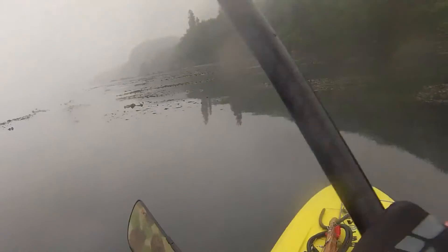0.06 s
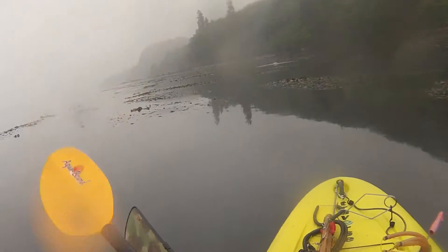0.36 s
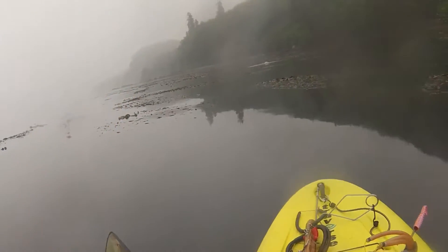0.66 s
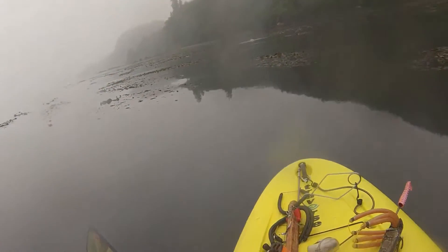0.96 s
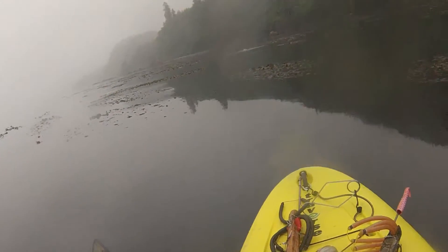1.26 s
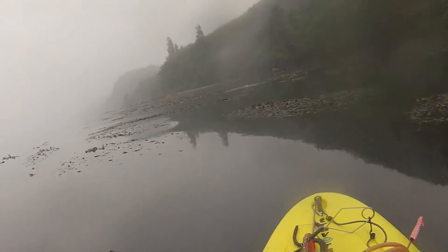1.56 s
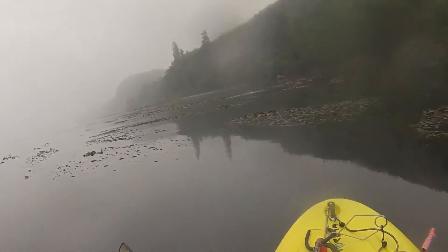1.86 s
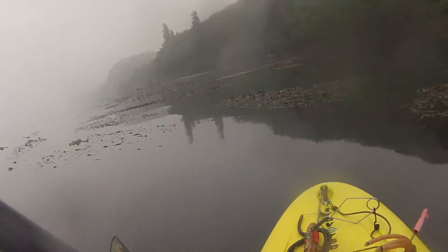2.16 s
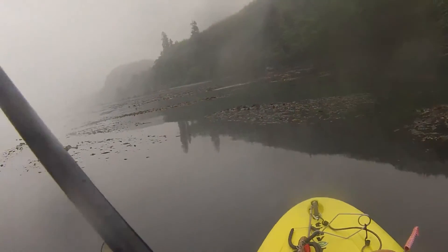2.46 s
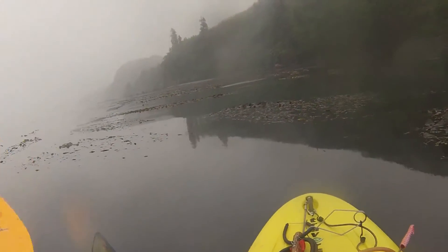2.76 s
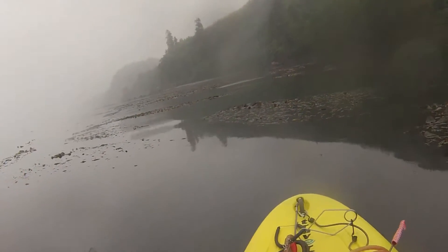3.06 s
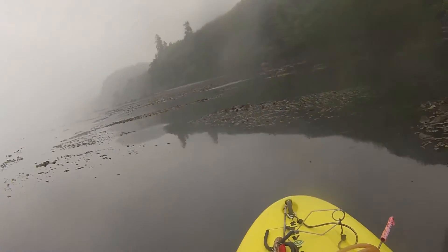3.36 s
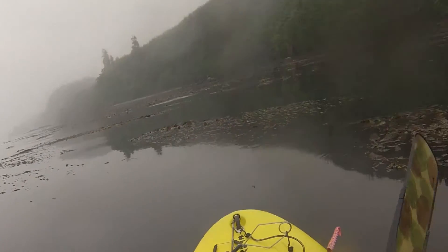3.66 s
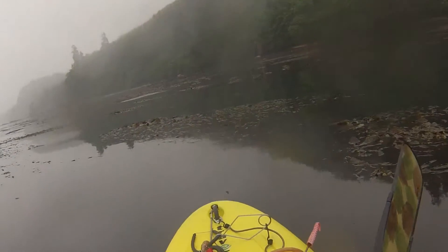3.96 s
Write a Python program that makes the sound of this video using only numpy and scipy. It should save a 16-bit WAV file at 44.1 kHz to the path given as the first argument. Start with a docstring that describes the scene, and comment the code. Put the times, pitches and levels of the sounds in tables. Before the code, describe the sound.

Gentle paddling on calm water, with small splashes, drips and a soft wind rumble.

```python
"""Gentle paddling on calm water, close to the microphone of a camera on board a small gliding craft.
Blade and hull lap up little splashes, drops tick on the surface, trapped bubbles ring and a fine
trickle follows the strokes. The camera's case colours these sounds; ripples knock dully under the hull.
Behind them, wind rumbles softly on the microphone over a faint hiss."""
import sys
import numpy as np
from scipy import signal
from scipy.fft import rfft, irfft
from scipy.io import wavfile

SR = 44100
rng = np.random.default_rng(int(sys.argv[2]) if len(sys.argv) > 2 else 0)


def output_pcm(signal):
    """Save a mono or channel-first signal as 16-bit PCM at the path in sys.argv[1].

    Samples are clipped to [-1, 1] before scaling.
    """
    pcm = np.clip(np.atleast_2d(signal).T, -1, 1) * 32767
    wavfile.write(sys.argv[1], SR, np.round(pcm).astype(np.int16))


N = 176400
TIME = np.arange(N) / SR


def from_db(db):
    """Decibels to gain."""
    return 10 ** (np.asarray(db) / 20)


def rms_one(x):
    """Scale to unit rms."""
    return x / np.sqrt(np.mean(x ** 2) + 1e-20)


def in_time(rows):
    """Each column of a curve at every sample."""
    times, *columns = np.transpose(rows)
    return [np.interp(TIME, times, column) for column in columns]


def add(out, at, sound):
    """Mix a sound in, starting `at` seconds."""
    start = int(at * SR)
    first, last = max(start, 0), min(start + len(sound), N)
    out[first:last] += sound[first - start:last - start]


def colour(x, spectrum):
    """Shape a sound by a spectrum, rolled off below 10 Hz; rms 1."""
    hz, db = np.transpose(spectrum)
    f = np.maximum(np.arange(len(x) // 2 + 1) * SR / len(x), 1)
    gain = from_db(np.interp(np.log(f), np.log(hz), db)) * np.minimum(f / 10, 1) ** 2
    return rms_one(irfft(rfft(x) * gain, len(x)))


def noise(spectrum):
    """Coloured noise; rms 1."""
    return colour(rng.standard_normal(N), spectrum)


def drift(points):
    """A wandering line through random points spaced evenly over the scene."""
    return np.interp(TIME, np.linspace(0, N / SR, points), rng.standard_normal(points))


def swell(t, rise, fall):
    """Exponential rise to a crest at t = 0, then exponential fall."""
    return np.exp(np.where(t < 0, t / rise, -t / fall))


def bubble_ring(hz, cycles, glide_per_s=1.6, size=4000):
    """A trapped bubble rises in pitch as it nears the surface, dying by 60 dB in about `cycles`."""
    t = TIME[:size]
    phase = 2 * np.pi * hz * t * (1 + glide_per_s * t / 2)
    return np.sin(phase) * np.exp(-np.log(1000) * t * hz / cycles)


def bubble_cloud(size, centre_hz, octaves, per_s, cycles, spread_db, patchy_db=0):
    """Tiny bubbles of random strength and pitch; patchy_db lets each pitch come and go; rms 1."""
    pitches = np.geomspace(450, 12000, 44)
    strengths = from_db(spread_db * np.minimum(rng.exponential(1, size), 3)) * rng.choice([-1, 1], size)
    clicks = strengths * (rng.random(size) < per_s / SR)
    pitch_index = rng.integers(0, len(pitches), size)
    out = np.zeros(size)
    for k, hz in enumerate(pitches):
        decay, angle = 1e-3 ** (hz / (cycles * SR)), 2 * np.pi * hz / SR
        resonator = [1, 0, -1], [1, -2 * decay * np.cos(angle), decay * decay]
        weight = np.sqrt(hz / centre_hz) / (1 + (np.log2(hz / centre_hz) / octaves) ** 2)
        if patchy_db:
            weight = weight * from_db(patchy_db * drift(points=24))
        out += weight * signal.lfilter(*resonator, clicks * (pitch_index == k) + 1e-18)
    return rms_one(out)


# Spectrum of still air over open water: f/Hz, relative level/dB
AIR_SPECTRUM = [(60, 3.5), (150, 0), (280, -2.5), (500, -6.5), (1000, -10), (1550, -11), (2000, -14.5),
                (2450, -13.5), (2900, -17.5), (4600, -19.5), (6000, -19), (6800, -22), (8500, -22),
                (11000, -23.5), (15000, -27)]
# Spectrum of the microphones' own hiss: f/Hz, relative level/dB
HISS_SPECTRUM = [(25, 12.5), (100, -4), (300, 12.5), (1000, 6.5), (3000, 9.5), (6000, 11.5), (11000, 8),
                 (15000, 3.5)]
# Tones of a faint electronic whine: f/Hz, level/dB
WHINE_TONES = [(3000, -87), (5999, -104)]

def air_and_hiss():
    """Open air and a thin whine in the centre; microphone hiss in opposite polarity left and right."""
    air = from_db(-62.5) * noise(AIR_SPECTRUM)
    whine = sum(np.sqrt(2) * from_db(db) * np.sin(2 * np.pi * hz * TIME) for hz, db in WHINE_TONES)
    hiss = from_db(-76) * noise(HISS_SPECTRUM) * np.array([[1], [-1]])
    return air + whine + hiss


# Spectrum of wind on the microphone: f/Hz, relative level/dB
WIND_SPECTRUM = [(12, 2), (20, -8.5), (27, -6.5), (45, -11.5), (62, -17.5), (85, -28), (120, -33),
                 (200, -44), (450, -49.5), (900, -71)]
# Rise and fall of that wind: t/s, relative level/dB
WIND_GUSTS = [(0, -38.5), (.18, -38), (.29, -46.5), (.39, -40.5), (.62, -41), (.88, -39), (1.13, -43),
              (1.8, -45), (2.07, -41), (2.22, -44.5), (2.8, -43.5), (2.92, -40.5), (3.25, -46.5), (4, -42)]

def wind(gain_db=2):
    """Air moving right on the microphone makes a soft, lumpy rumble, eased in and out."""
    level_db, = in_time(WIND_GUSTS)
    return noise(WIND_SPECTRUM) * from_db(gain_db + level_db) * signal.windows.tukey(N, .01)


# Soft knocks of water under the craft: t/s, level/dB, f/Hz
HULL_KNOCKS = [(1.338, -47, 96), (1.397, -52, 151), (1.668, -49.5, 126)]

def hull_knocks():
    """Ripples strike the hull below the microphone, each a dull, short ring."""
    out = np.zeros(N)
    for at, db, hz in HULL_KNOCKS:
        add(out, at, from_db(db) * bubble_ring(hz, cycles=10))
    return out


# Resonances of the case around the microphone: f/Hz, width/Hz, lift/dB
CASE_RESONANCES = [(1500, 350, 2), (2270, 450, 2), (3640, 1600, 3), (4930, 410, 3.5), (6880, 420, 6.5),
                   (10780, 1100, 9)]

def camera_case(x, gain_db=-2.5):
    """The camera's case resonates, lifting a few bands above the rest."""
    for hz, width_hz, db in CASE_RESONANCES:
        band = signal.lfilter(*signal.iirpeak(hz, hz / width_hz, fs=SR), x)
        x = x + (from_db(db) - 1) * band
    return from_db(gain_db) * x


# Soft fizzing beside the craft: middle t/s, half length/s, level/dB, f/Hz
RUNOFF = [(0.556, 0.07, -73.5, 3680), (1.169, 0.098, -77.5, 3250), (1.467, 0.092, -73.5, 2340),
          (1.919, 0.16, -78, 4130), (3.027, 0.031, -72.5, 3850), (3.659, .16, -76.5, 2230)]

def runoff(size=30000):
    """Fine bubbles of nearly one size swell and fade as water runs off."""
    out, t = np.zeros(N), (np.arange(size) - size // 2) / SR
    for at, half_length, db, hz in RUNOFF:
        cloud = bubble_cloud(size, hz, octaves=0.099, per_s=10000, cycles=86, spread_db=7)
        envelope = np.exp(-(t / half_length) ** 2 / 2)
        add(out, at + t[0], from_db(db) * envelope * cloud)
    return out


# Ebb and swell of the water alongside, before scaling: t/s, lap level/dB, trickle level/dB
WAKE_LEVELS = [(0.0, -60.5, -59), (0.15, -61.5, -81), (0.36, -61, -68.5), (0.67, -67, -57.5),
               (1.1, -73.5, -68.5), (1.7, -66.5, -70), (1.98, -65.5, -60), (2.12, -63.5, -66),
               (2.44, -85, -61.5), (2.81, -72, -77), (2.99, -63.5, -60.5), (3.14, -65.5, -55),
               (3.3, -82, -67.5), (3.48, -71, -70), (3.69, -64.5, -71), (4.0, -68, -64)]

def wake():
    """Water laps along the hull and trickles from the blade: a low and a high cloud of bubbles."""
    def gain(db, depth):
        return from_db(db.mean() + depth * (db - db.mean()))

    lap_db, trickle_db = in_time(WAKE_LEVELS)
    lap = bubble_cloud(N, centre_hz=1550, octaves=0.77, per_s=1200,
                       cycles=25, spread_db=4.5, patchy_db=3.5)
    trickle = bubble_cloud(N, centre_hz=3850, octaves=1, per_s=6500,
                           cycles=15.4, spread_db=3.5, patchy_db=3.5)
    return lap * gain(lap_db - 7, depth=0.97) + trickle * gain(trickle_db - 10, depth=0.71)


# Single bubbles close to the craft: t/s, relative level/dB, f/Hz
BUBBLES = [(0.0123, -51, 1150), (.032, -50, 2210), (0.246, -45, 2280), (0.5326, -46, 2170),
           (0.621, -50.5, 1480), (0.8067, -46.5, 2400), (1.233, -52, 2420), (1.3863, -51, 1150),
           (1.4675, -54, 2220), (1.5587, -47.5, 1300), (2.2813, -52, 1380), (2.391, -55, 1090),
           (2.4094, -51.5, 2030), (2.76, -52, 1950), (2.768, -55, 2230), (2.826, -56.5, 704),
           (2.896, -52, 1940), (2.961, -52.5, 2200), (3.2549, -46, 3910)]

def bubbles(rise_s=0.0018, shed_s=0.0049):
    """Each bubble starts softly, rings unevenly and sheds a smaller, higher, quieter one."""
    out = np.zeros(N)
    for at, db, hz in BUBBLES:
        for delay, gain_db, pitch_ratio in [(0, 1, 1), (shed_s, -8.5, rng.uniform(1.06, 1.25))]:
            ring = bubble_ring(hz * pitch_ratio, cycles=43)
            uneven = 1 + 0.5 * drift(points=2400)[:len(ring)]
            onset = 1 - np.exp(-TIME[:len(ring)] / rise_s)
            add(out, at + delay, from_db(db + gain_db) * ring * uneven * onset)
    return out


# Spectrum of a drop's impact: f/Hz, relative level/dB
TICK_SPECTRUM = [(500, -5), (1500, 1), (2600, 0), (5000, 2.5), (7500, 2.5), (11000, -7), (12300, -14),
                 (15000, -24)]

def drop_tick(crest_s=0.0016, size=512):
    """A drop hits the surface with a brief snap, smooth and bright in spectrum."""
    envelope = swell(TIME[:size] - crest_s, rise=0.00047, fall=0.0026)
    burst = rfft(envelope * rng.standard_normal(size))
    flat_burst = irfft(burst / np.abs(burst), size)
    snap = colour(flat_burst, TICK_SPECTRUM) * np.sqrt(envelope)
    return rms_one(snap) * np.sqrt(np.mean(envelope ** 2))


# Drops landing near the microphone: t/s, tick level/dB, ring level/dB, ring f/Hz
DROPS = [(.428, -67, -55.5, 4800), (0.7463, -46, -51, 4990), (0.8190, -62, -51, 5400),
         (0.8406, -61, -51, 5270), (2.0968, -63, -44.5, 3970), (2.115, -63, -48.5, 3600),
         (2.159, -61, -60, 4740), (3.117, -58, -62, 5100), (3.1778, -68, -49.5, 4930),
         (3.1969, -56, -43, 2453), (3.2048, -66, -49, 2400), (3.3222, -60, -52, 4780),
         (3.339, -59, -54, 2330)]

def drops(rise_s=0.00037):
    """A drop lands with a tick, and a short bubble ring builds up under it."""
    out = np.zeros(N)
    for at, tick_db, ring_db, hz in DROPS:
        ring = bubble_ring(hz, cycles=59)
        onset = 1 - np.exp(-(TIME[:len(ring)] / rise_s) ** 2)
        add(out, at, from_db(tick_db) * drop_tick())
        add(out, at, from_db(ring_db) * ring * onset)
    return out


# Little splashes at close range: crest t/s, rise/s, level/dB, centre f/Hz, spread/octaves
SPLASHES = [(.225, 0.024, -59, 770, 0.31), (0.335, 0.0056, -55.5, 2270, 0.52),
            (0.367, 0.0069, -60, 1620, 0.21), (0.699, .006, -57, 2100, 0.88),
            (0.716, 0.003, -54, 1420, 0.21), (0.715, 0.014, -67, 4500, 1.1), (0.721, .002, -57, 1990, 0.42),
            (1.452, 0.016, -64, 2370, 0.13), (1.588, 0.005, -58.5, 1640, 0.29),
            (1.774, 0.058, -66.5, 1960, 0.38), (2.018, 0.051, -63.5, 1590, 0.68),
            (2.105, 0.0018, -55.5, 1900, 0.58), (2.108, 0.0038, -57.5, 3760, 0.12),
            (2.779, 0.008, -58, 1380, .4), (2.847, 0.021, -63, 1550, 0.39),
            (2.921, 0.0026, -57.5, 1500, 0.33), (2.933, .002, -54, 1850, 0.17),
            (3.153, 0.0098, -56.5, 1550, 0.13), (3.164, 0.0044, -58, 1710, 0.25),
            (3.177, 0.008, -54.5, 3430, 0.65), (3.198, 0.0028, -56.5, 4270, 0.26)]

def paddle_splashes(size=10000):
    """Blade and hull stir up quick swells of dense bubbles; a slower splash also falls more slowly."""
    out, t = np.zeros(N), (np.arange(size) - size // 2) / SR
    for at, rise, db, hz, octaves in SPLASHES:
        cloud = bubble_cloud(size, hz, octaves, per_s=11000, cycles=12, spread_db=2.5)
        add(out, at + t[0], from_db(db) * swell(t, rise, fall=rise + 0.0023) * cloud)
    return out


def scene():
    """From on board: water and wind sit in the centre, over a faint, wide hiss."""
    water = paddle_splashes() + drops() + bubbles() + runoff() + wake()
    return camera_case(water) + hull_knocks() + wind() + air_and_hiss()


def record(dry):
    """The treble is cut steeply above 15.3 kHz."""
    return signal.sosfilt(signal.ellip(12, .1, 70, 15300, fs=SR, output="sos"), dry)


dry = scene()
out = record(dry)
output_pcm(out)
```